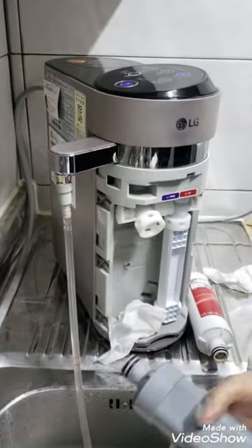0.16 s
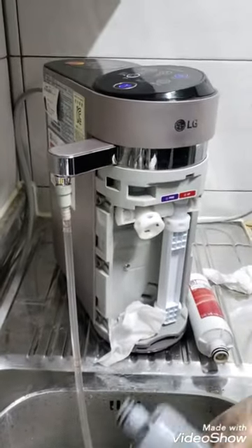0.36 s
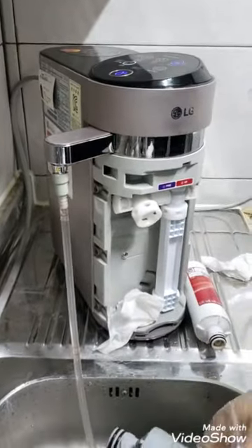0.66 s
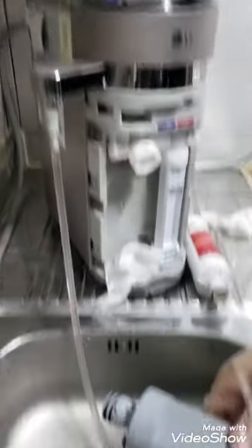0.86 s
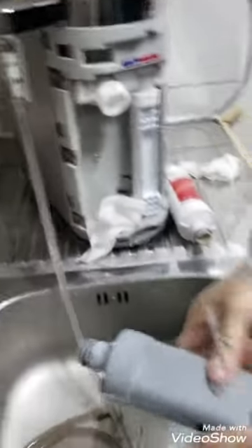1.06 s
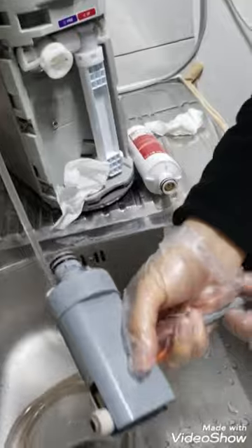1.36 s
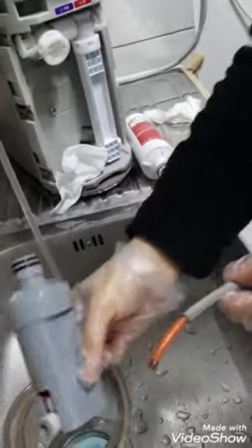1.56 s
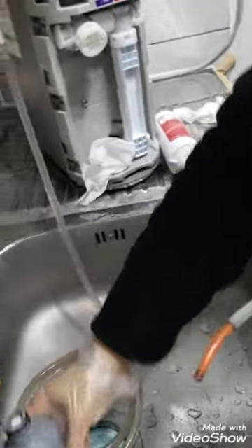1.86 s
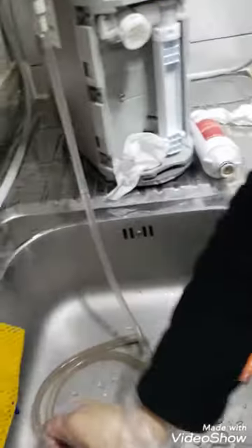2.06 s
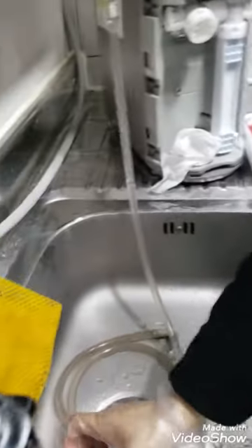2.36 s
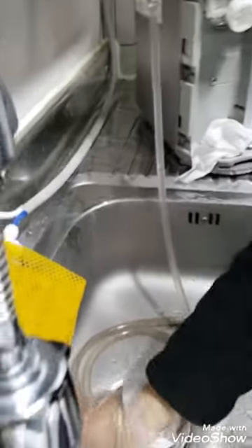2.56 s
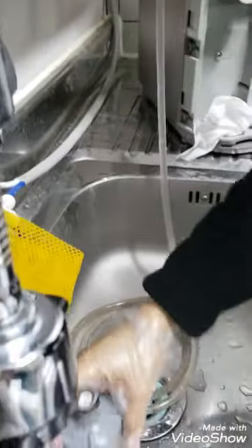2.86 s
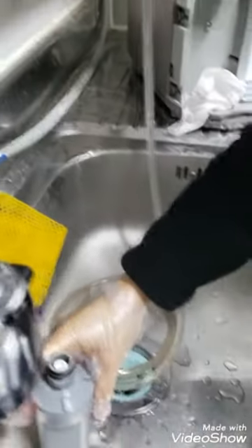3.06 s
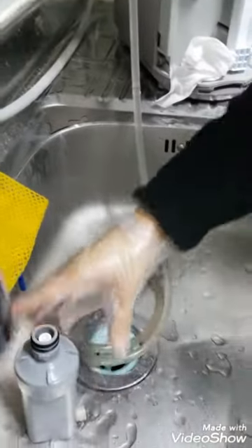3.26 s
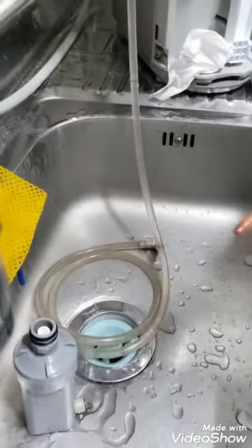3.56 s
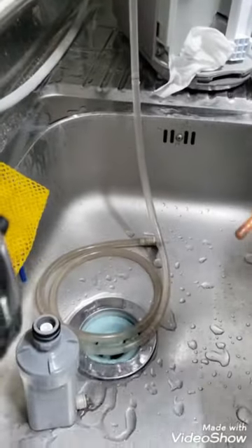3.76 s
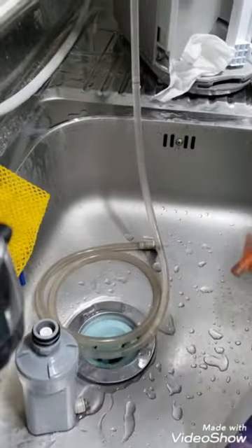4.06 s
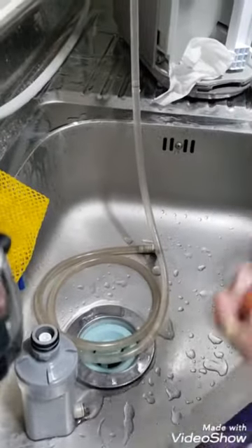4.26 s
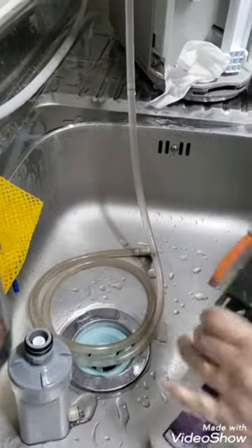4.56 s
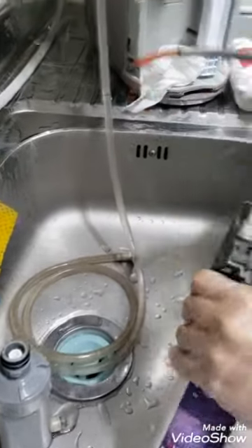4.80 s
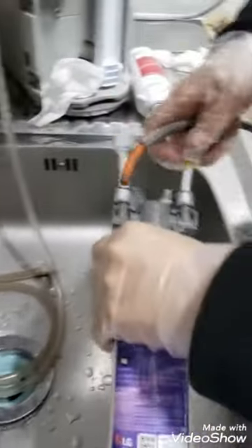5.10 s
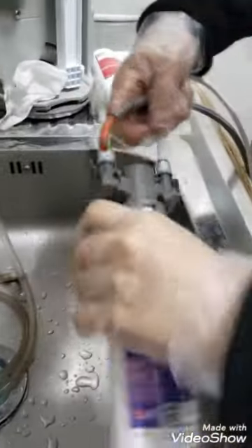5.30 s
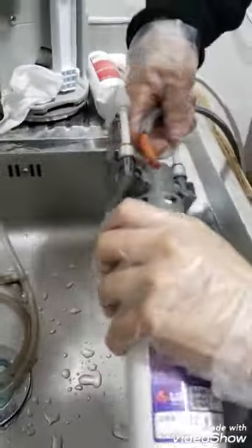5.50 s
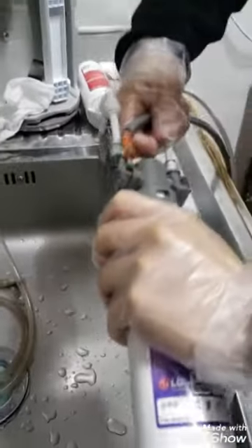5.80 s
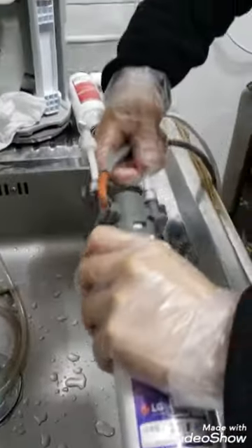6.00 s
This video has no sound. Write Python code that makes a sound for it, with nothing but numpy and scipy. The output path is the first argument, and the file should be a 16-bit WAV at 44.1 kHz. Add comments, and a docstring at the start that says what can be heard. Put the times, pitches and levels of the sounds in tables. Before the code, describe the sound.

Hollow plastic housing bumps and tumbles in a steel sink, a fitting snaps, thin plastic gloves crinkle closely in a quiet tiled kitchen.

```python
"""Plastic filter housings and tubes handled over a steel sink, close to the microphone, in order of time:
a housing is lowered and bumps the basin (damped modes, noise cracks), a fitting snaps once, more bumps;
the housing scrapes (resonated slips), tumbles and is stood upright; then a cartridge is lifted to its hose.
Thin wet gloves crinkle (coloured grains) in both moves and tick; a hose creaks, hollow plastic murmurs,
and tiled walls answer (decaying noise) over a quiet kitchen."""
import sys
import numpy as np
from scipy import signal
from scipy.fft import rfft, irfft, next_fast_len
from scipy.io import wavfile
from scipy.ndimage import uniform_filter1d, map_coordinates

SR = 44100
rng = np.random.default_rng(int(sys.argv[2]) if len(sys.argv) > 2 else 0)


def bounce(signal):
    """Save signal as a 16-bit WAV file at the path given by the first command-line argument."""
    frames = np.transpose(np.atleast_2d(signal))
    limited = np.clip(frames, -1, 1)
    pcm = np.round(limited * 32767).astype(np.int16)
    wavfile.write(sys.argv[1], SR, pcm)


N = 270774
AGE_S = np.arange(SR) / SR
TIME_S = np.arange(N) / SR

# All levels are relative; each source sets its own gain.
# plastic against the basin: start_s, strength_db, hardness_db, floor_boom_db, favoured_hz
KNOCKS = [(0.2437, -25, 3.5, 9, 380), (0.2647, -33, 0.5, -4, 404), (0.3466, -34, -2, 2.5, 447),
          (0.4537, -37.5, 11, 4.5, 810), (1.3044, -21.5, 0.5, -17, 980), (1.6348, -28, -16, -13, 460),
          (2.095, -32, 5, 7, 597), (2.3593, -12.5, -1.5, -13.5, 430), (2.3751, -17, 1, -10, 823),
          (2.3916, -15, -8.5, -15, 527), (2.4256, -19.5, 5.5, 0, 545), (2.4543, -17, 2.5, -17.5, 360),
          (2.4653, -20.5, -5.5, -11, 596), (2.4956, -25, 6.5, -10.5, 682), (2.511, -21, 0, -11, 596),
          (2.591, -31.5, 1, 0.5, 390), (2.6748, -36, -9.5, -4, 841), (2.8073, -31, 0.5, -4, 790),
          (2.848, -53, 11.5, 7, 600), (3.026, -23, 2, 0.5, 590), (4.4646, -46.5, 8.5, 12.5, 746),
          (4.7528, -47.5, 3.5, -7, 920), (4.8753, -44.5, 13, -2, 820)]
# modes of the steel basin: mode_hz, level_db, t60_s
BASIN_MODES = [(51, -8, .86), (60, -9, .45), (92, -7.5, .68), (105, 0, .46), (136.5, .5, .42),
               (161.7, 2, .5), (186.8, -1, .5), (210, -3, .38), (228, -5, .35), (250, -3, .3),
               (334, -.5, .25), (356, 2, .32), (388, -6, .5), (448, -7, .25), (478, -10, .36),
               (544, -1, .38), (597, -3.5, .32), (677, -6, .33), (752, -9, .24), (801, -3.5, .36),
               (865, -6, .24), (938, -9.5, .28), (1040, -7.5, .22), (1080, -4.5, .33)]
# dense upper modes of the steel: freq_hz, density_db (per Hz)
PANEL_SPECTRUM = [(120, -25.5), (280, -5), (400, -2.5), (900, -4), (1080, -13.5), (1250, -11), (2000, -16),
                  (5000, -56.5)]
# hard plastic contact: freq_hz, density_db (per Hz)
CLACK_SPECTRUM = [(400, -23.5), (900, -1), (1400, -7), (2100, 2), (3000, -1), (4500, -3.5), (6800, -10),
                  (8500, -15.5), (10000, -17), (12000, -12), (16000, -19)]
# housing wall: mode_hz, level_db, t60_s
SHELL_MODES = [(1169, 0, .22), (1357, -2, .18), (1496, 0, .19), (1623, -1, .2), (1750, -2, .15),
               (2100, -2, .17), (2522, -1, .15), (2962, 1, .15), (3550, -4, .12)]
# housing slides on the steel: time_s, level_db
SLIDE = [(2.13, -38), (2.188, -47), (2.304, -44), (2.338, -49), (2.36, -29)]
# resonances of the sliding housing: centre_hz, width_hz, level_db
SCRAPE_RESONANCES = [(593, 70, 2.5), (660, 87, -4.5), (830, 81, -4.5)]
# a fitting snaps home: start_s, level_db
SNAPS = [(0.9938, -15)]
# crack of the fitting: freq_hz, density_db (per Hz)
FITTING_SPECTRUM = [(300, -32), (1050, -23), (1600, -12), (2600, 1.5), (3400, -6.5), (5000, -4.5),
                    (8500, -9.5), (12000, -3.5), (16000, -25.5)]
# ring of the fitting: mode_hz, level_db, t60_s
FITTING_MODES = [(1470, -6.5, 0.075), (2340, -8.5, 0.1), (2950, -9, .13), (3083, 0.5, 0.064)]
# loudest glove creases and tube ticks: flip_s, level_db, brightness_db
TICKS = [(0.0054, -26.5, -25), (0.106, -36, -11), (0.159, -37.5, 3), (0.2299, -29.5, -0.5),
         (0.8946, -52, 15.5), (0.9614, -32, -5), (1.2311, -35.5, -3), (1.478, -27, -13), (1.662, -37, -5),
         (1.8537, -38, -5.5), (2.171, -35, -10), (3.3766, -42, -6.5), (3.4795, -41.5, -5),
         (3.7882, -37, -8), (3.9545, -36, -15), (4.1893, -30, -13), (4.335, -28.5, -11),
         (4.3671, -27.5, -7), (4.4135, -44, 5.5), (4.572, -32, -24), (4.5897, -27, -11), (4.673, -40, 6.5),
         (5.0479, -38, 5), (5.0739, -31.5, 0), (5.4606, -30.5, -6), (5.625, -35, -3.5), (5.7696, -37.5, -6),
         (6.0157, -40.5, -9)]
# lower part of a crease: freq_hz, density_db (per Hz)
CREASE_SPECTRUM = [(150, -55), (600, -15), (1500, -8.5), (2600, -2), (5000, -0.5), (7200, -2.5),
                   (8500, -15.5), (16000, -24.5)]
# bright part of creases and rustle: freq_hz, density_db (per Hz)
SPARK_SPECTRUM = [(1000, -75.5), (4000, -32), (7500, -8), (10000, -1.5), (12000, 2), (16000, -2.5)]
# crinkle of the film: freq_hz, density_db (per Hz)
FILM_SPECTRUM = [(100, -42), (300, -7), (600, -3), (1200, -1), (2100, 3), (3200, 2), (5000, 2.5),
                 (7200, -4.5), (8300, -18.5), (16000, -27.5)]
# glove slides over plastic: peak_s, level_db, reach_s (peak to -17 dB)
RUBS = [(0.022, -40, 0.041), (0.122, -43.5, 0.032), (0.188, -45.5, 0.032), (0.444, -44.5, 0.15),
        (1.034, -44, 0.075), (2.078, -45.5, 0.021), (2.31, -53, 0.022), (2.878, -55, 0.057),
        (3.443, -55.5, 0.064), (4.31, -44.5, 0.079), (4.48, -44.5, 0.028), (4.591, -40.5, 0.038),
        (4.728, -51.5, 0.038), (4.849, -45, 0.038), (5.044, -39, 0.043), (5.337, -44, 0.047),
        (5.468, -43, 0.0065), (5.79, -52.5, 0.019), (5.977, -58.5, 0.077)]
# hand effort as rustle level, a housing lowered into the basin: time_s, level_db
LOWERING = [(0.0, -56), (0.35, -48), (0.53, -57.5), (0.74, -51), (1.15, -51.5), (1.45, -49), (1.88, -56.5),
            (2.07, -58), (2.34, -43)]
# hand effort as rustle level, a cartridge lifted to its hose: time_s, level_db
LIFTING = [(3.56, -71), (3.69, -56), (3.88, -54), (4.21, -51.5), (4.41, -45.5), (5.21, -49.5), (5.46, -47),
           (5.98, -73), (6.14, -81)]
# hose twists on its stub: peak_s, level_db, resonance_hz, reach_s (peak to -17 dB)
CREAKS = [(0.388, -37, 2300, 0.01), (0.96, -37.5, 2330, 0.014), (2.686, -42.5, 2010, 0.014),
          (5.36, -51, 2063, 0.033), (5.432, -53.5, 2065, 0.045)]
# hollow housing and the hollow below the sink: freq_hz, density_db (per Hz)
HOLLOW_SPECTRUM = [(30, -15.5), (60, -7.5), (110, 3), (170, 0.5), (230, -1.5), (350, -18.5), (600, -11.5),
                   (1200, -37)]
# slimmer cartridge, humming higher: freq_hz, density_db (per Hz)
CARTRIDGE_SPECTRUM = [(30, -11.5), (60, -6.5), (120, -3), (175, 4), (240, -6.5), (450, -12), (1200, -22)]
# soft nudges of hose and housing: start_s, thud_db, overtone_db
NUDGES = [(0.046, -41.5, -55.5), (0.461, -32, -38.5), (0.689, -55, -45.5), (0.763, -36.5, -49),
          (0.87, -48, -52.5), (0.997, -36, -53.5), (1.42, -49, -40.5), (1.81, -41, -47.5), (4.77, -37, -68),
          (4.897, -35, -59), (5.12, -44.5, -66), (5.51, -49, -58), (5.65, -42.5, -72)]
# thud of the hollow housing: mode_hz, level_db, t60_s
HOUSING_LOW_MODES = [(130.5, 0.5, 0.21), (163.8, -1.5, 0.32), (186.3, -2.5, 0.38)]
# overtones of the hollow housing: mode_hz, level_db, t60_s
HOUSING_HIGH_MODES = [(275, -5, 0.38), (341.6, 1, 0.31), (396.4, -2.5, 0.29), (577, -15, 0.61)]
# tiled walls: freq_hz, t60_s
TILES = [(200, 0.33), (1000, 0.087), (3000, 0.26), (8000, 0.25), (15000, 0.1)]
# quiet of the kitchen: freq_hz, density_db (per Hz)
QUIET_SPECTRUM = [(25, -2), (60, 0), (160, -8), (300, -25.5), (1000, -31), (3000, -23), (8000, -27),
                  (16000, -25.5)]
# the two microphone ports: freq_hz, correlation (-1 to 1)
PORT_CORRELATION = [(200, 0.9), (400, .5), (800, 0.54), (1500, -0.23), (5000, 0), (9000, 0.58),
                    (16000, 0.8)]
# the two microphone ports: freq_hz, left_minus_right_db
PORT_LEAN = [(100, 2.5), (500, 2), (1500, 2.5), (3000, 4.5), (5000, 5.5), (7200, 9.5), (9000, -2),
             (12000, 1), (15500, -2.5)]

MODE_SCATTER_DB = 1.5
# upper steel modes: gain, then dB per dB of hardness and of boom
CLANG_DB, CLANG_PER_HARDNESS, CLANG_PER_BOOM = -3, .3, -.12
SPOT_DB, SPOT_OCTAVES = 6, 0.57  # lift and width around favoured_hz
LET_GO_DB_PER_S = 73.5  # rustle slope either side of a move
CRINKLE_DB, FIZZ_DB = 0.4, -0.2  # relative to effort
RUB_FIZZ_DB = 2.5  # fizz over crinkle in a rub
# small creases: rate, level and scatter relative to effort, brightness
STRAY_PER_S, STRAY_DB, STRAY_SCATTER_DB, STRAY_BRIGHT_DB = 20, 7.5, 1.5, -5.5
# murmur at mean effort, then dB per dB of effort
HOUSING_MURMUR_DB, CARTRIDGE_MURMUR_DB, MURMUR_GROWTH = -53, -66.5, 0.66
TOP_HZ = 16100


def amp(db):
    """Decibels to gain."""
    return 10 ** (np.asarray(db) / 20)


def unit(x):
    """Scale to rms 1."""
    return x / np.sqrt(np.mean(x ** 2) + 1e-20)


def along(points, hz):
    """Read (freq_hz, value) points on a log frequency axis."""
    point_hz, value = np.transpose(points)
    return np.interp(np.log(hz + 1), np.log(point_hz), value)


def curves(rows):
    """One value per sample for each column after the time."""
    time_s, *columns = np.transpose(rows)
    return [np.interp(TIME_S, time_s, column) for column in columns]


def wobble(knots_per_s):
    """Smooth random curve."""
    knots = rng.standard_normal(int(N * knots_per_s / SR) + 4)
    return map_coordinates(knots, [np.arange(N) * knots_per_s / SR])


def fade(t60_s):
    """Exponential decay of 60 dB in t60_s."""
    return np.exp(-np.log(1000) * AGE_S / t60_s)


def swell(peak_s, reach_s):
    """Gaussian stroke, 17 dB down at reach_s from its peak."""
    return np.exp(-2 * ((TIME_S - peak_s) / reach_s) ** 2)


def filtered(x, response):
    """Multiply the spectrum of x by a function of frequency."""
    n = x.shape[-1]
    padded = next_fast_len(n + 8192)
    return irfft(rfft(x, padded) * response(np.fft.rfftfreq(padded, 1 / SR)), padded)[..., :n]


def coloured(pair, spectrum):
    """Two signals, as mid and side, become stereo of rms 1 with the ports' correlation."""
    def weights(hz):
        turn = np.arccos(np.clip(along(PORT_CORRELATION, hz), -1, 1)) / 2
        return amp(along(spectrum, hz)) * np.array([np.cos(turn), np.sin(turn)])

    mid, side = filtered(pair, weights)
    return unit(np.array([mid + side, mid - side]))


def noise(spectrum, size=SR):
    """Coloured stereo noise of rms 1."""
    return coloured(rng.standard_normal((2, size)), spectrum)


def grains(rate_per_s, spread_db):
    """Uneven impulses: shared instants, separately drawn heights in two channels."""
    sizes = amp(spread_db * np.minimum(rng.standard_normal(N), 2))
    struck = rng.random(N) < rate_per_s / SR
    return struck * sizes * rng.uniform(-0.77, 1, (2, N))


def ring(modes, scatter_db, apart_hz):
    """Damped modes of scattered strength; higher ones reach the ports further out of step."""
    out = np.zeros((2, SR))
    for hz, db, t60_s in modes:
        size, detune, skew = rng.standard_normal(3)
        port_skew = np.array([[1], [-1]]) * skew * min((hz / apart_hz) ** 2, 1)
        phase = np.pi * rng.integers(2) + port_skew
        wave = np.sin(2 * np.pi * hz * (1 + 0.0051 * detune) * AGE_S + phase)
        out += amp(db + scatter_db * size) * fade(t60_s) * wave
    return out


def add(track, start_s, sound):
    """Mix a sound in at start_s, cut at the track's end."""
    start = max(round(start_s * SR), 0)
    part = track[:, start:start + sound.shape[1]]
    part += sound[:, :part.shape[1]]


def basin():
    """Each blow rings the sink: the loose floor booms, a hard contact near the stiff rim clangs."""
    out = np.zeros((2, N))
    for start_s, body_db, hard_db, boom_db, spot_hz in KNOCKS:
        clang_db = body_db + CLANG_DB + CLANG_PER_HARDNESS * hard_db + CLANG_PER_BOOM * boom_db
        weight = [(108, body_db + boom_db - 1.5), (165, body_db - 4), (245, body_db - 1), (330, clang_db - 9.5)]
        modes = []
        for hz, db, t60_s in BASIN_MODES:
            # modes that swing most at the spot struck
            favour_db = SPOT_DB * np.exp(-(np.log2(hz / spot_hz) / SPOT_OCTAVES) ** 2)
            modes.append((hz, db + along(weight, hz) + favour_db, t60_s))
        steel = ring(modes, MODE_SCATTER_DB, apart_hz=517) * (1 - fade(0.008))
        steel *= amp(-3.0) + amp(-5.0) * fade(0.14)  # faster early decay: housing still in touch
        wash = amp(clang_db - 4.5) * noise(PANEL_SPECTRUM) * fade(0.34) * (1 - fade(0.008))
        # the hollow below rumbles on
        cabinet = amp(body_db - 12) * noise(HOLLOW_SPECTRUM) * fade(0.45) * (1 - fade(0.016))
        add(out, start_s, steel + wash + cabinet)
    return out


def clacks():
    """The hard housing gives a short crack and a brief ring of its wall at each blow."""
    out = np.zeros((2, N))
    for start_s, body_db, hard_db, *_ in KNOCKS:
        crack = noise(CLACK_SPECTRUM) * (fade(0.046) + amp(-8.5) * fade(0.13))
        shell = amp(-19.5) * ring(SHELL_MODES, MODE_SCATTER_DB, apart_hz=900)
        add(out, start_s, amp(body_db + hard_db - 2) * (crack + shell) * (1 - fade(0.019)))
    return out


def scrape():
    """Tiny slips on the steel excite a few resonances before the housing tumbles."""
    slide_db, = curves(SLIDE)
    sliding = (TIME_S > SLIDE[0][0]) & (TIME_S < SLIDE[-1][0])
    touching = uniform_filter1d(1. * sliding, size=400)  # samples

    def body(hz):
        return sum(amp(db) * (1j * hz * width_hz / (centre_hz ** 2 - hz ** 2 + 1j * hz * width_hz))
                   for centre_hz, width_hz, db in SCRAPE_RESONANCES)

    slip_spectrum = [(300, -9.0), (600, -3.0), (900, -2.5), (2000, -18.5)]  # freq_hz, density_db
    slips = coloured(grains(rate_per_s=640, spread_db=1.5), slip_spectrum)
    return touching * amp(slide_db - 4.0) * unit(filtered(slips, body))


def snap():
    """A sharp noise crack and the brief ring of the fitting, strongest near 3 kHz."""
    out = np.zeros((2, N))
    for start_s, db in SNAPS:
        burst = fade(.05) + fade(.008) / 2
        crack = unit(filtered(rng.standard_normal((2, SR)), lambda hz: amp(along(FITTING_SPECTRUM, hz))))
        tone = amp(-11.5) * ring(FITTING_MODES, MODE_SCATTER_DB, apart_hz=900)
        add(out, start_s, amp(db) * (crack * (burst + amp(-19.5) * fade(0.12)) + tone))
    return out


def effort(move):
    """Effort in dB through one move of the hands, falling away before and after it."""
    before_s = np.maximum(move[0][0] - TIME_S, 0)
    after_s = np.maximum(TIME_S - move[-1][0], 0)
    return curves(move)[0] - LET_GO_DB_PER_S * (before_s + after_s)


def busy():
    """The greater effort of the two moves, in dB."""
    return np.maximum(effort(LOWERING), effort(LIFTING))


def gloves():
    """Thin film buckles in clumps of tiny cracks, and swells with every rub."""
    held = amp(busy())
    rubbed = sum(amp(db) * swell(peak_s, reach_s) for peak_s, db, reach_s in RUBS)
    crinkle = amp(CRINKLE_DB) * held + rubbed
    fizz = amp(FIZZ_DB) * held + amp(RUB_FIZZ_DB) * rubbed
    clumps = amp(3.2 * wobble(90) - 7.5)
    fine = unit(grains(rate_per_s=7000, spread_db=4))
    sparse = unit(grains(rate_per_s=200, spread_db=3))
    cracks = fine + amp(-7) * sparse
    return clumps * (crinkle * coloured(cracks, FILM_SPECTRUM) + fizz * coloured(cracks, SPARK_SPECTRUM))


def strays():
    """Small creases at random times, their level following hand effort: rows like TICKS."""
    effort_db = busy()
    slot = SR // 40
    starts = np.arange(0, N, slot)
    chance, size = rng.random(len(starts)), rng.standard_normal(len(starts))
    when = np.minimum(starts + rng.integers(slot, size=len(starts)), N - 1)
    return [(i / SR, effort_db[i] + STRAY_DB + STRAY_SCATTER_DB * z, STRAY_BRIGHT_DB)
            for i, u, z in zip(when, chance, size) if u < STRAY_PER_S * slot / SR]


def ticks():
    """The film strains, a crease flips with a spike, and the film around it shivers on."""
    out, lead, life = np.zeros((2, N)), SR // 50, SR // 5
    strain = amp(-13.5) * fade(0.031)[lead:0:-1]  # rises up to the flip
    flip = np.r_[strain, amp(-1.5) * fade(.009) + amp(-7) * fade(.12)][:life]
    spike = np.r_[strain, amp(-1) * fade(.008) + amp(-8) * fade(.07)][:life]
    for flip_s, db, bright_db in TICKS + strays():
        low = amp(db - 7) * noise(CREASE_SPECTRUM, size=life) * flip
        high = amp(db + bright_db + 1.5) * noise(SPARK_SPECTRUM, size=life) * spike
        add(out, flip_s - lead / SR, low + high)
    return out


def shifting(x, depth_db):
    """The folds of the film keep changing size, and with them the colour of the crinkle."""
    z = signal.stft(x, nperseg=512)[2]
    field = uniform_filter1d(rng.standard_normal(z.shape[1:]), size=9, axis=0)  # over frequency
    field = uniform_filter1d(field, size=7, axis=1)  # over time
    return signal.istft(z * amp(depth_db * unit(field)), nperseg=512)[1][:, :N]


def creaks():
    """Quick slips of the hose excite one rough resonance of its fitting."""
    out, slips = np.zeros((2, N)), grains(rate_per_s=1400, spread_db=7.0)
    for peak_s, db, hz, reach_s in CREAKS:
        b, a = signal.iirpeak(hz, 7, SR)
        out += amp(db) * swell(peak_s, reach_s) * unit(signal.lfilter(b, a, slips))
    return out


def handling():
    """Hands keep the hollow plastic murmuring, more with more effort; a nudge makes it hum briefly."""
    out = np.zeros((2, N))
    for move, db, body in [(LOWERING, HOUSING_MURMUR_DB, HOLLOW_SPECTRUM),
                           (LIFTING, CARTRIDGE_MURMUR_DB, CARTRIDGE_SPECTRUM)]:
        above_mean_db = effort(move) - np.mean(move, axis=0)[1]
        out += amp(db + MURMUR_GROWTH * above_mean_db) * noise(body, size=N)
    for start_s, thud_db, overtone_db in NUDGES:
        low = amp(thud_db - 3.5) * ring(HOUSING_LOW_MODES, MODE_SCATTER_DB, apart_hz=600)
        high = amp(overtone_db + 2.0) * ring(HOUSING_HIGH_MODES, MODE_SCATTER_DB, apart_hz=556)
        add(out, start_s, (low + high) * (1 - fade(0.06)))
    return out


def room(x):
    """The tiled corner's answer: a noise tail, each frequency dying at its own speed."""
    hz, t, z = signal.stft(rng.standard_normal((2, SR // 2)), SR, nperseg=256)
    decay = np.exp(-np.log(1000) * t / along(TILES, hz)[:, None])
    tail = signal.istft(z * decay, SR, nperseg=256)[1]
    tail = np.pad(tail, ((0, 0), (SR // 300, 0)))  # delay before the answer
    return signal.fftconvolve(x, tail / np.linalg.norm(tail[0]), axes=1)[:, :N]


def quiet():
    """Steady coloured noise: the quiet of the kitchen."""
    return amp(-63) * noise(QUIET_SPECTRUM, size=N)


def scene():
    """Everything at the sink, leaning left at most frequencies, over the quiet of the kitchen."""
    hard = clacks() + snap()
    film = shifting(gloves() + ticks(), depth_db=2.28) + creaks()
    echo = room(amp(-9) * hard + amp(-9.0) * film)
    mix = basin() + hard + film + echo + handling() + scrape() + quiet()
    return filtered(mix, lambda hz: amp(np.array([[.5], [-.5]]) * along(PORT_LEAN, hz)))


def record(dry):
    """The phone drops the deepest bass, rounds the tallest peaks and cuts steeply above TOP_HZ."""
    x = signal.sosfilt(signal.butter(4, 38, "highpass", fs=SR, output="sos"), dry)
    x = x / (1 + np.abs(x / .97) ** 8) ** (1 / 8)
    return filtered(x, lambda hz: 1 / np.sqrt(1 + (hz / TOP_HZ) ** 200))


dry = scene()
out = record(dry)
bounce(out)
```